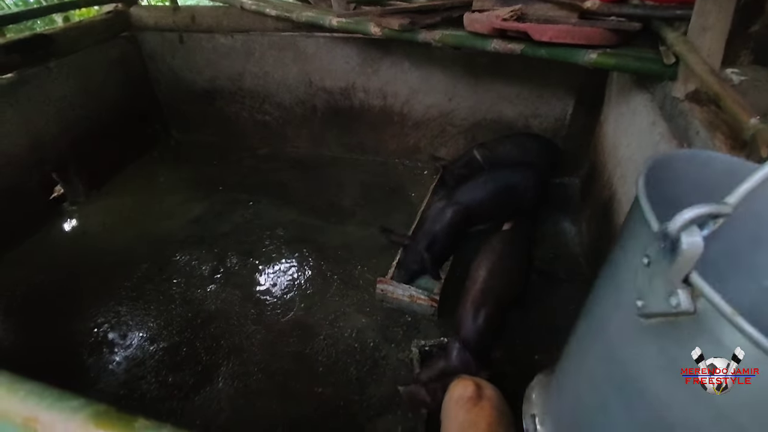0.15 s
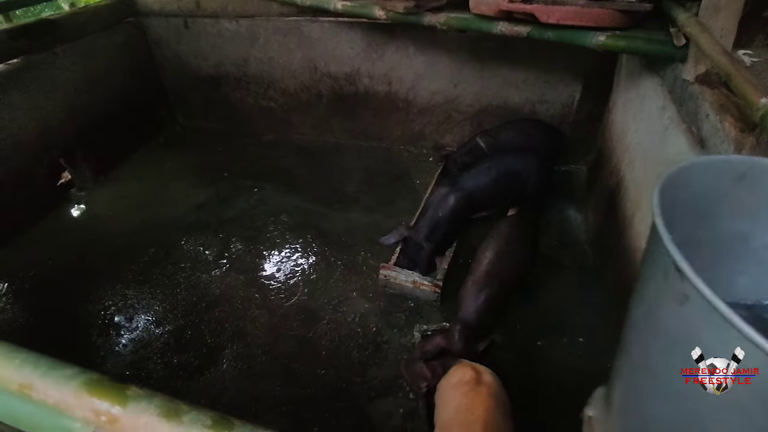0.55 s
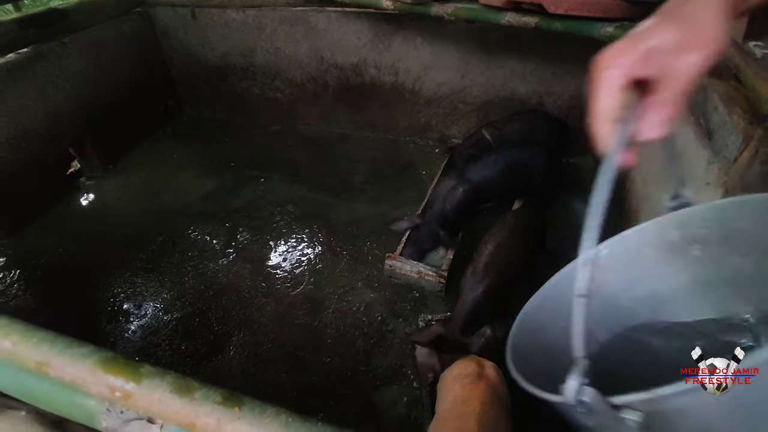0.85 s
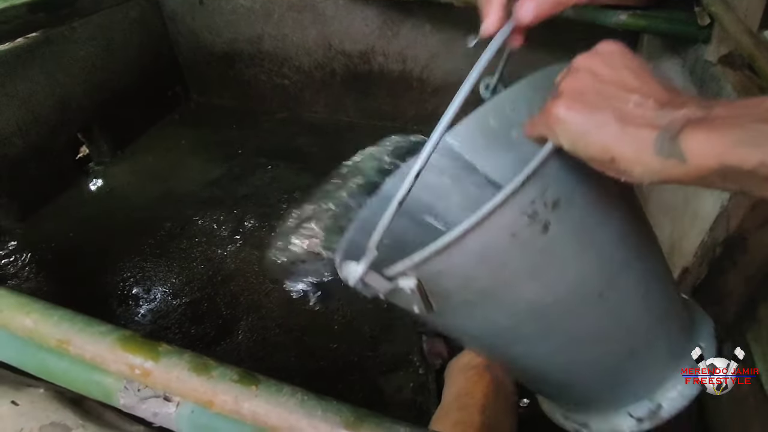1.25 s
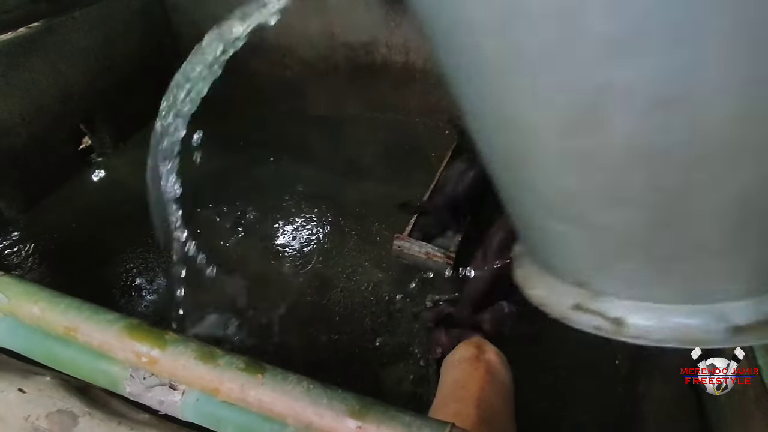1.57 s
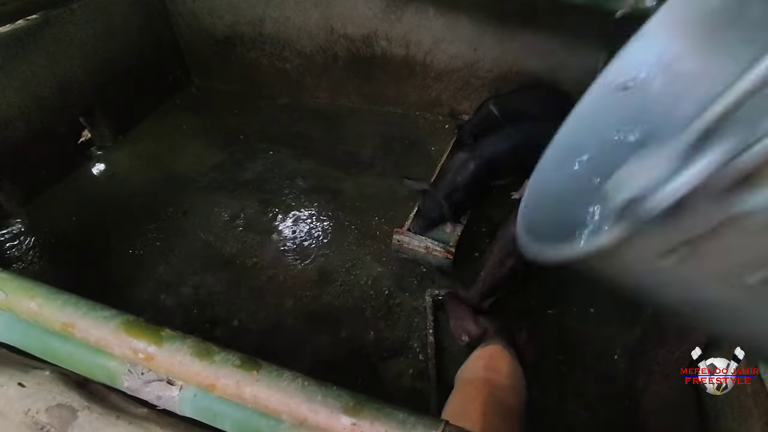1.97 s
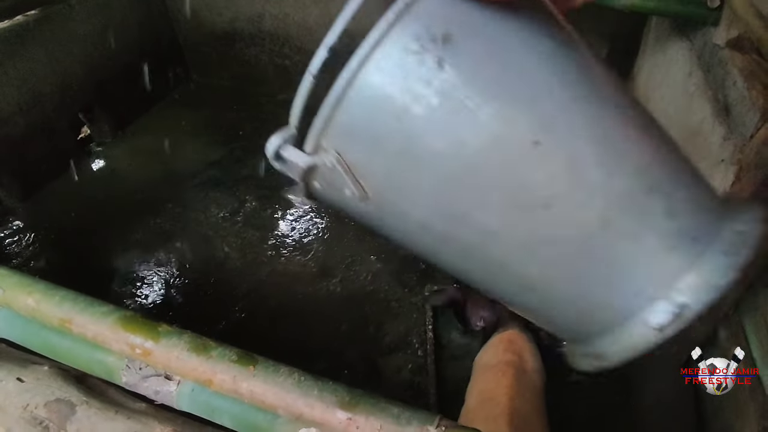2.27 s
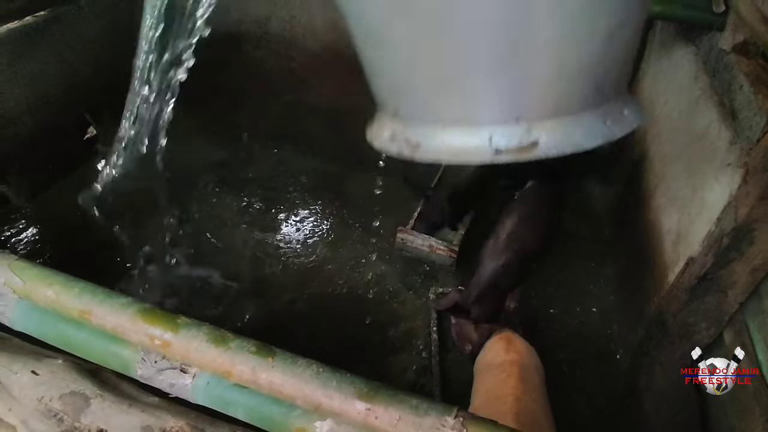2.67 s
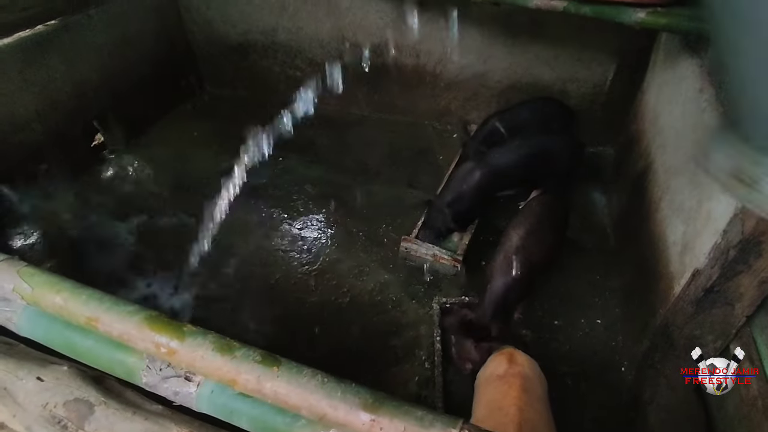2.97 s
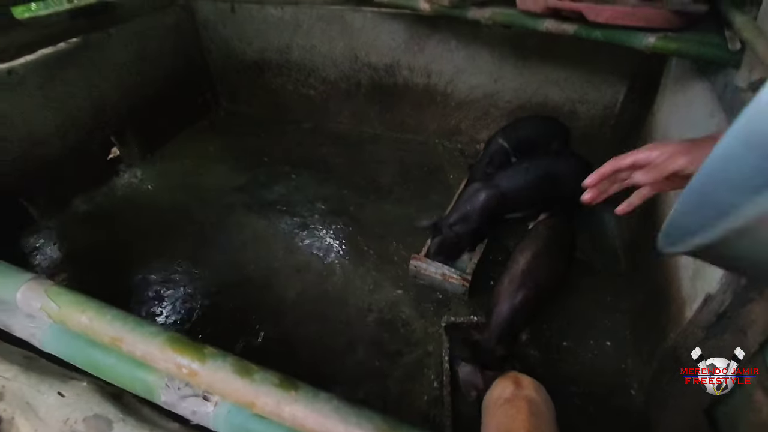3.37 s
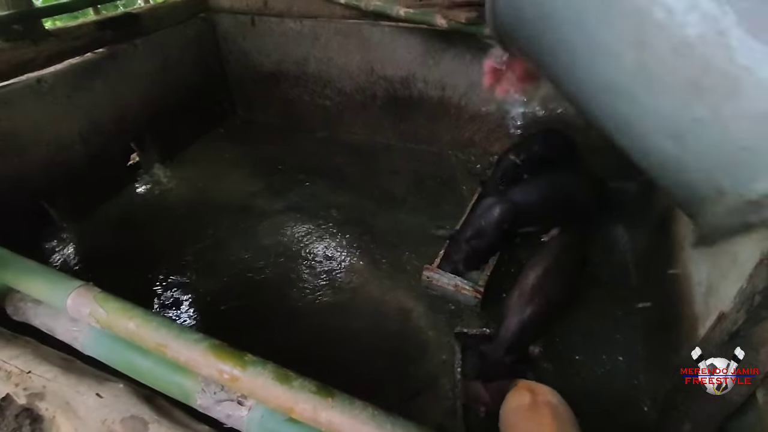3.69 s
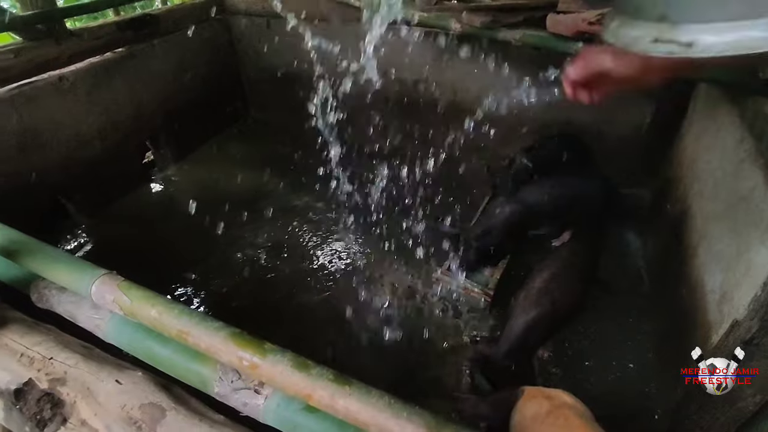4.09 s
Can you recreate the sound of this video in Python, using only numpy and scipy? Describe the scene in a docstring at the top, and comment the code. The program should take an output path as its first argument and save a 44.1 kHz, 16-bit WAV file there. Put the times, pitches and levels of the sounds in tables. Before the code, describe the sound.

In a small walled pen with a wet concrete floor, heard closely in stereo, water slops quietly in a steel bucket from 0 to 1.3 s, with rounded plops, little gurgles, ticks and a soft low wind buffet near 0.9 s. At about 1.4 s the wire handle clanks several times on the rim, ringing briefly and rattling. The first throw lands around 1.6 to 2.1 s, a spattering splash with heavy slaps and bubbly plops near 1.9 s, then thins to drips and a near lull. The second throw swells from 2.65 s, slaps hardest around 2.95 s and fizzes away by 3.4 s. A metallic knock at 3.66 s opens the third, a darker gush peaking near 3.8 s with a loud bang and low air thump. Bright clanks ring at 4.05 and 4.2 s over remaining spatter. Faint steady outdoor hiss continues throughout, with short wall echoes.

```python
"""A small walled pen with a wet concrete floor: water slops in a steel bucket and is thrown out in sheets.
A pair of microphones stands close by, brushed by moving air; the walls answer within a fifth of a second.
Water is showers of tiny damped tones over coloured noise; plops are single bubbles with rising pitch.
Lumps slapping down are bursts of noise, drops and wire tips click, and each blow on the bucket cracks,
rings the steel's modes and rattles the wire handle on the rim."""
import sys
import numpy as np
from scipy import signal
from scipy.fft import rfft, irfft, next_fast_len
from scipy.io import wavfile
from scipy.ndimage import uniform_filter1d, map_coordinates

SR = 44100
rng = np.random.default_rng(int(sys.argv[2]) if len(sys.argv) > 2 else 0)


def transcribe(u):
    """Save the signal u as a 16-bit wav file named by the first command-line argument.

    u: samples, shape (n,) or (channels, n), limited to [-1, 1]; the rate is SR.
    q: integer samples, one column per channel.
    """
    v = np.clip(np.atleast_2d(u).T, -1, 1)
    q = np.round(v * 32767).astype(np.int16)
    wavfile.write(sys.argv[1], SR, q)


N = 186707  # length in samples


def amp(db):
    """Decibels to amplitude factor."""
    return 10 ** (np.asarray(db) / 20)


def unit(x):
    """Scales a signal to an rms of one."""
    return x / np.sqrt(np.mean(x ** 2) + 1e-20)


def along(points, hz):
    """Reads a curve of (Hz, value) points on a log frequency axis."""
    f, v = np.transpose(points)
    return np.interp(np.log(hz + 1), np.log(f + 1), v)


def curves(rows):
    """One value per sample for each column after the time."""
    s, *cols = np.transpose(rows)
    return [np.interp(np.arange(N) / SR, s, c) for c in cols]


def wobble(rate):
    """A smooth random curve, rate knots a second."""
    knots = rng.standard_normal(int(N / SR * 200) + 4)
    return map_coordinates(knots, [np.arange(N) * min(rate, 199) / SR])


def filtered(x, response):
    """Multiplies the spectrum of x by a response of frequency."""
    n = x.shape[-1]
    m = next_fast_len(n + 8192)
    return irfft(rfft(x, m) * response(np.fft.rfftfreq(m, 1 / SR)), m)[..., :n]


def add(track, s, sound):
    """Mixes a sound into the track at second s."""
    part = track[..., max(round(s * SR), 0):][..., :sound.shape[-1]]
    part += sound[..., :part.shape[-1]]


def noise(length):
    """White noise, unrelated at the two microphones."""
    return rng.standard_normal((2, length))


def patches(x, depth_db):
    """Random louder and softer streaks, about 150 Hz by 40 ms."""
    z = signal.stft(x, nperseg=512)[2]
    field = uniform_filter1d(rng.standard_normal(z.shape[1:]), size=2, axis=0)
    field = uniform_filter1d(field, size=7, axis=1)
    return signal.istft(z * amp(depth_db * unit(field)), nperseg=512)[1][:, :N]


# Likeness of the two microphones. Each row: frequency in Hz, left-right likeness from 0 to 1.
MIC_LIKENESS = [(60, 0.95), (250, 0.96), (640, 0.78), (1300, 0.017), (15000, 0.022)]


def spread(pair):
    """Two unrelated signals become a pair alike in the bass and nearly unrelated in the treble."""
    turn = lambda hz: np.arccos(np.clip(along(MIC_LIKENESS, hz), -1, 1)) / 2
    mid, side = filtered(pair, lambda hz: np.array([np.cos(turn(hz)), np.sin(turn(hz))]))
    return np.array([mid + side, mid - side])


# Steady surroundings. Each row: frequency in Hz, relative level in dB per Hz.
YARD_SPECTRUM = [(88, -28), (150, 2.5), (815, -1.5), (1520, -6.5), (2240, 1), (4100, -16), (7950, -9.5),
                 (10400, -16.5), (15700, -8.5)]


def yard():
    """Steady surroundings: coloured noise with patches and a slight waver, at about -50 dB."""
    level = amp(-50.5 + 1.5 * wobble(14))
    bed = filtered(noise(N), lambda hz: amp(along(YARD_SPECTRUM, hz)))
    return level * unit(spread(patches(bed, depth_db=4)))


# Air brushing the microphones. Each row: peak time in seconds, level in dB, rise by 20 dB in seconds,
# fall by 20 dB in seconds, thrum relative to that level in dB.
GUSTS = [(0.33, -58, 0.16, 0.39, -11), (0.94, -39.5, 0.09, 0.11, -5), (1.26, -70, 0.6, 0.33, -4),
         (1.75, -59, 0.75, 0.27, 10), (2.17, -69, 0.092, 0.095, 19), (3.84, -48, 0.024, 0.14, -31),
         (4.13, -68, 0.21, 0.42, 7)]


def gusts():
    """Gust amplitude over time, for the rumble and for the thrum: straight rises and falls in dB."""
    now = np.arange(N) / SR
    total = np.zeros((2, N))
    for s, db, rise, fall, thrum_db in GUSTS:
        below_peak = 20 * np.maximum((s - now) / rise, (now - s) / fall)
        total += amp(db - below_peak + np.array([[0], [thrum_db]]))
    return total


# Rumble of air on the microphones. Each row: frequency in Hz, relative level in dB per Hz.
RUMBLE_SPECTRUM = [(15, -44), (30, -6), (75, -2.5), (110, 0.5), (140, -41), (240, -120)]


def rumble(gust):
    """Moving air buffets the microphones: lumpy low noise, swelling with the gusts."""
    calm_db, shared = -63.5, 0.44  # shared: part of each microphone's rumble that reaches the other
    low = filtered(noise(N), lambda hz: amp(along(RUMBLE_SPECTRUM, hz)))
    lumpy = (low + shared * low[::-1]) * amp(4.4 * wobble(25.0))
    return (amp(calm_db) + gust) * unit(lumpy)


# Thrum of bucket and floor. Each row: frequency in Hz, relative level in dB per Hz.
THRUM_SPECTRUM = [(70, -56), (110, -6), (160, 0.5), (230, -11.5), (330, -4.5), (600, -120)]


def thrum(gust_thrum):
    """Water and gusts shake bucket and floor: low noise that follows the flow and the gusts."""
    rest_db, under_flow_db = -70.5, -25
    flow_db = curves(np.vstack(WATER_FLOW))[0]
    shake = amp(rest_db) + amp(flow_db + under_flow_db) + gust_thrum
    low = filtered(noise(N), lambda hz: amp(along(THRUM_SPECTRUM, hz)))
    return shake * unit(spread(low) * amp(5.2 * wobble(25.18)))


# Pressure jolts. Each row: start in seconds, level in dB, fading time of the pull in seconds,
# time scale of the rebound in seconds.
PRESSURE_JOLTS = [(3.836, -19, 0.021, 0.19), (4.042, -28, 0.0067, 0.038)]


def jolts():
    """Pressure jolts pull the diaphragms in and let them swing back."""
    out, t = np.zeros((2, N)), np.arange(SR // 4) / SR
    for s, db, suck, rebound in PRESSURE_JOLTS:
        swing = 0.37 * np.sin(np.pi * np.clip(t / (1.14 * rebound), 0, 1)) ** 2
        pull = (1 - np.exp(-t / 0.0016)) * np.exp(-t / suck)
        add(out, s, amp(db + np.array([[1.5], [-1.5]])) * (swing - pull))  # stronger on the left
    return out


def air():
    """Moving air: rumble, thrum and jolts at the microphones."""
    gust, gust_thrum = gusts()
    return rumble(gust) + thrum(gust_thrum) + jolts()


# Echo of the walled pen. Each row: frequency in Hz, time to fall by 60 dB in seconds.
PEN_DECAY = [(300, 0.16), (2000, 0.13), (10000, 0.11)]


def pen(x):
    """The walls answer each tenth of a second of sound with a new echo pattern, the treble dying first."""
    out, step = np.zeros((2, N)), SR // 10
    for start in range(0, N, step):
        hz, t, z = signal.stft(noise(SR // 4), SR, nperseg=128)
        tail = signal.istft(z * amp(-60 * t / along(PEN_DECAY, hz)[:, None]), SR, nperseg=128)[1]
        tail = tail / np.linalg.norm(tail[0])
        echo = signal.fftconvolve(x[None, start:start + step], tail, axes=1)
        add(out, start / SR + .002, echo)  # first echo after 2 ms
    return spread(out)


def droplets(count, centre_hz, octaves, cycles, scatter_db):
    """A rain of tiny damped tones, each with its own pitch and size, unrelated in the two channels."""
    length = 400  # samples per tone
    when, pitch, size, chan = rng.random((4, count))
    hz = np.clip(centre_hz * 2 ** (octaves * (2 * pitch - 1)), 100, SR / 2.5)[:, None]
    t = np.arange(length) / SR
    phase = hz * t * (1 + .03 * hz * t / cycles)  # a bubble's pitch rises as it nears the surface
    level = amp(-scatter_db * np.log(size + 0.0091))[:, None]
    tones = level * np.exp(-hz * t / cycles) * np.sin(2 * np.pi * phase)
    right = (chan > .5)[:, None]
    at = (when * N).astype(int)[:, None] + np.arange(length) + right * (N + length)
    both = np.bincount(at.ravel(), tones.ravel(), 2 * (N + length))
    return unit(both.reshape(2, -1)[:, :N])


def layer(grains, share, spectrum, low_hz, flutter_db, patchy_db):
    """Droplets over a bed of rush, coloured together, fluttering and patchy; little below low_hz."""
    mix = np.sqrt(share) * grains + np.sqrt(1 - share) * noise(N)
    mix = patches(mix, patchy_db) * amp(flutter_db * (wobble(23.02) + 2.8 * wobble(60)))
    return unit(filtered(mix, lambda hz: amp(along(spectrum, hz)) * hz ** 2 / (hz ** 2 + low_hz ** 2)))


# Large bubbles, spatter and fine mist. Each row: frequency in Hz, relative level in dB per Hz.
GURGLE_SPECTRUM = [(120, -52), (200, -1), (343, -4.5), (684, -10), (1300, -3.5), (1690, 8.5), (2860, -120)]
SPRAY_SPECTRUM = [(710, 5.5), (1200, -3), (1490, -8), (2120, 0.5), (3010, 1.5), (4590, -7.5), (5070, 0.5),
                  (7500, -16.5), (9750, -41), (16500, -120)]
MIST_SPECTRUM = [(4410, 4), (7500, -2), (8050, -2), (9780, -9.5), (12000, -4), (14900, -2.5), (15700, -21)]
# Moving water, in four groups: slopping in the carried bucket, then the first, second and third throw.
# Each row: time in seconds, flow level in dB, mist relative to the spray in dB.
WATER_FLOW = [
    [(0.0, -53, -3), (0.27, -50.5, -4), (0.51, -45, -2.5), (0.72, -48.5, -18), (0.78, -66, -2),
     (0.825, -55.5, 0), (0.92, -44, -21), (1.0, -53.5, 2), (1.12, -46.5, -20), (1.195, -52, -18),
     (1.256, -47, -19), (1.372, -42.5, -42)],
    [(1.545, -41, -3), (1.585, -38, 7.5), (1.625, -42, 6.5), (1.65, -34, 2), (1.751, -27, -2.5),
     (1.86, -32, -1.5), (1.89, -37.5, 1), (1.91, -36.5, -1), (1.96, -41.5, 4.5), (2.0, -37.5, 2.5),
     (2.1, -36.5, 7.5), (2.14, -46.5, 2), (2.25, -56.5, 0)],
    [(2.6, -70, -4), (2.655, -44.5, -7), (2.676, -41.5, 12.5), (2.778, -33.5, 0.5), (2.822, -44.5, 9.5),
     (2.842, -37, 8.5), (2.956, -23.5, -5.5), (3.08, -29.5, 5), (3.138, -33, -2.5), (3.22, -35, 3.5),
     (3.312, -31.5, 3.5), (3.428, -49, 0)],
    [(3.562, -52.5, -4), (3.655, -37.5, -20), (3.69, -46, 5), (3.724, -26, -23), (3.752, -28.5, -3.5),
     (3.79, -31.5, -6), (3.826, -22, -12.5), (3.93, -46, 0), (4.035, -49, -7), (4.11, -35, -7.5),
     (4.2, -39.5, 10)],
]


def water():
    """Large bubbles gurgle, drops spatter, fine mist fizzes; gentle flow spatters darker than a hard throw."""
    spray_db, mist_db = curves(np.vstack(WATER_FLOW))
    gurgle_db = spray_db - 9.5 - 0.6 * np.maximum(mist_db, -16)  # water with little mist gurgles more
    fizz_db = spray_db + mist_db

    drops = droplets(count=2500, centre_hz=777, octaves=0.75, cycles=2.3, scatter_db=2.6)
    gurgle = layer(drops, .35, GURGLE_SPECTRUM, low_hz=149, flutter_db=1.1, patchy_db=3.5)
    drops = droplets(count=9000, centre_hz=2733, octaves=1.362, cycles=3.5, scatter_db=2.6)
    spray = layer(drops, .35, SPRAY_SPECTRUM, low_hz=700, flutter_db=.5, patchy_db=2.6)
    drops = droplets(count=5000, centre_hz=10900, octaves=0.96, cycles=0.32, scatter_db=-14.0)
    fizz = layer(drops, 0.052, MIST_SPECTRUM, low_hz=3900, flutter_db=.4, patchy_db=4)

    dark = filtered(spray, lambda hz: 1 / (1 + (hz / 3800) ** 4))
    spray = dark + (spray - dark) * amp(0.52 * np.minimum(spray_db + 60, 0))
    return spread(amp(spray_db) * spray + amp(gurgle_db) * gurgle + amp(fizz_db) * fizz)


def bubble(pitch_hz, t):
    """One damped tone of rising pitch, its phase wandering in the churning water."""
    t60 = 0.03  # seconds
    wander = .03 * np.cumsum(rng.standard_normal(len(t)))  # radians
    tone = np.sin(2 * np.pi * pitch_hz * (t + 0.07 * t * t / t60) + wander)
    return amp(-60 * t / t60) * (1 - np.exp(-t / 0.00025)) * tone


# Bubbles closing in the water. Each row: start in seconds, level in dB, starting pitch in Hz.
PLOPS = [(0.0, -27.5, 1220), (0.13, -39.5, 2730), (0.166, -32, 606), (0.362, -22, 787), (0.305, -29.5, 970),
         (0.399, -29.5, 750), (0.398, -35.5, 3340), (0.422, -36, 2720), (0.432, -29, 2850),
         (0.444, -29, 2790), (0.459, -32.5, 590), (0.461, -22.5, 1880), (0.489, -25.5, 1004),
         (0.533, -24, 690), (0.629, -30, 3060), (0.657, -27, 584), (0.733, -42, 3670), (0.83, -37.5, 810),
         (1.009, -32.5, 846), (1.044, -25, 1370), (1.048, -23.5, 2050), (1.126, -39, 1450),
         (1.264, -36, 1810), (1.154, -27.5, 2330), (1.2, -28.5, 1224), (1.225, -29, 410), (1.239, -31, 600),
         (1.287, -31.5, 350), (1.311, -30.5, 2620), (1.322, -26.5, 1700), (1.33, -26, 980),
         (1.345, -32, 680), (1.64, -25.5, 630), (1.7, -22, 636), (1.92, -16, 587), (1.922, -24.5, 880),
         (1.922, -18, 2310), (1.922, -22.5, 2970), (1.945, -29, 600), (1.973, -34, 1730), (1.987, -20, 550),
         (1.99, -32, 740), (2.054, -32, 2520), (2.077, -25.5, 1620), (2.086, -33, 354), (2.146, -32.5, 220),
         (2.197, -39, 2530), (2.273, -33, 2130), (2.415, -40, 850), (2.765, -42, 2800), (2.965, -19, 3110),
         (3.145, -25.5, 473), (3.591, -31.5, 630), (3.617, -27.5, 650)]


def plops():
    """A bubble rings briefly; four quieter neighbours of nearby pitch follow within some ms."""
    out, t = np.zeros(N), np.arange(SR // 8) / SR
    draws = rng.standard_normal((len(PLOPS), 4, 3))
    for (s, db, hz), neighbours in zip(PLOPS, draws):
        add(out, s, amp(db) * bubble(hz, t))
        for late, size, level in neighbours:
            quieter = amp(db - 10.5 + 2 * level)
            add(out, s + 0.0083 * abs(late), quieter * bubble(hz * (1 + 0.065 * size), t))
    return filtered(out, lambda hz: 1j * hz / (1j * hz + 150))  # small bubbles radiate no bass


# Lumps of water slapping down. Each row: start in seconds, relative level in dB, centre in Hz,
# time to fall by 60 dB in seconds.
SLAPS = [(0.081, -32, 2450, 0.056), (0.165, -35, 1190, 0.1), (0.283, -33, 5270, 0.052),
         (0.301, -29, 3500, 0.11), (0.303, -34.5, 1010, 0.54), (0.383, -32, 2620, 0.14),
         (0.5919, -41, 2180, 0.51), (0.6273, -28.5, 2660, 0.064), (0.6342, -24.5, 5440, 0.079),
         (0.7237, -31.5, 3930, 0.14), (0.829, -45, 1050, 0.15), (0.9062, -29, 1030, 0.06),
         (1.041, -26.5, 1150, 0.097), (1.154, -30.5, 2200, 0.042), (1.201, -38, 950, 0.19),
         (1.312, -29, 1670, 0.098), (1.698, -20, 2800, 0.067), (1.752, -22, 3000, 0.051),
         (1.907, -19.5, 2230, 0.095), (1.921, -14.5, 2160, 0.052), (1.9729, -19, 1790, 0.099),
         (1.9863, -21, 3160, 0.27), (2.0537, -19.5, 2370, 0.12), (2.073, -15, 1550, 0.027),
         (2.272, -38, 3060, 0.18), (2.417, -37, 3900, 0.24), (2.6332, -30.5, 2570, 0.14),
         (2.6935, -35, 4530, 0.12), (2.7588, -20, 2640, 0.085), (2.9292, -24, 1230, 0.26),
         (2.949, -18, 4500, 0.075), (3.038, -18.5, 3470, 0.083), (3.0904, -16, 3860, 0.062),
         (3.4598, -30, 930, 0.073), (3.591, -43, 900, 0.13), (3.732, -22, 1150, 0.15),
         (3.799, -16, 2500, 0.37), (3.812, -23.5, 790, 0.23), (3.8237, -22.5, 4440, 0.52)]


def slaps():
    """A sudden burst of spray around one pitch region that thins out, with some mist above it."""
    out, t = np.zeros((2, N)), np.arange(SR // 5) / SR
    for s, db, centre_hz, t60 in SLAPS:
        mist_db = -24 + 0.99 * np.log2(centre_hz / 2500)  # brighter slaps carry more mist

        def colour(hz):
            body_db = -14 * np.abs(np.log2((hz + 1) / centre_hz))  # fall per octave from the centre
            return amp(np.maximum(body_db, along(MIST_SPECTRUM, hz) + mist_db)) * hz / (hz + 400)

        burst = unit(filtered(noise(len(t)), colour))
        rise = 1 - np.exp(-t / (.012 * t60))
        add(out, s, burst * amp(db - 5.5 - 60 * t / t60) * rise)
    return spread(out)


# Single drops or the wire's tip striking steel or concrete.
# Each row: start in seconds, peak level in dB, centre in Hz.
TICKS = [(0.112, -26.5, 6200), (0.124, -35, 4500), (0.2389, -25, 2300), (0.239, -25.5, 7100),
         (0.247, -37, 7500), (0.281, -29, 6000), (0.311, -28, 6000), (0.385, -30, 4800), (0.636, -37, 5500),
         (1.3805, -10.5, 4800), (1.599, -25, 5250), (1.923, -14.5, 2370), (2.076, -21, 1600),
         (2.969, -15, 2750), (3.664, -10.5, 2680), (3.8385, -7, 4460), (4.044, -5, 5500)]


def ticks():
    """A dry click of a few ms around one pitch region."""
    out, t = np.zeros((2, N)), np.arange(SR // 50) / SR
    for s, db, centre_hz in TICKS:
        colour = lambda hz: amp(-10 * np.abs(np.log2((hz + 1) / centre_hz)))  # dB per octave from the centre
        click = filtered(noise(len(t)), colour)
        click = click * amp(-60 * t / .012) * np.minimum(t * 2000, 1)  # dies by 60 dB in 12 ms
        add(out, s, amp(db) * click / np.abs(click).max(axis=1, keepdims=True))
    return out


def drift(rough, t):
    """Water and hands unsettle a ring's phase: a random walk, rough radians per sample."""
    return rough * np.cumsum(rng.standard_normal(len(t)))


# The bucket's wall and rim. Each row: nominal mode in Hz, relative level in dB,
# time to fall by 60 dB in seconds.
STEEL_MODES = [(674, -16.5, 0.14), (995, -14, 0.15), (1542, -9, 0.094), (2320, -8, 0.15), (2594, -10, 0.16),
               (2983, -2, 0.12), (3180, -11, 0.081), (3550, -11, 0.21), (3756, -5.5, 0.15),
               (4220, -1, 0.076), (4452, -6, 0.14), (4890, -1.5, 0.06), (5100, -3.5, 0.095),
               (5080, -3, 0.094), (5600, -5, 0.055), (6130, -1, 0.048), (6400, -26, 0.033),
               (6800, -15, 0.042), (7200, -15, 0.034), (8200, -10, 0.11), (11300, -14.5, 0.17),
               (13800, -13, 0.11), (14100, -5, 0.11)]


def wall_ring(t):
    """Modes of wall and rim, each struck at a new strength; the grip shifts their pitch from blow to blow."""
    ring = np.zeros((2, len(t)))
    for hz, level_db, t60 in STEEL_MODES:
        strength = amp(level_db + rng.normal(0, 3.55) - 60 * t / t60)
        turns = hz * rng.normal(1, .02) * t + rng.random((2, 1))
        ring += strength * np.sin(2 * np.pi * turns + drift(0.079, t))
    return ring


# The empty bucket's bottom. Each row: mode in Hz, relative level in dB, time to fall by 60 dB in seconds.
BOTTOM_MODES = [(313, -3, 0.16), (404, -20, 0.15)]


def bottom_boom(s, t):
    """The bottom's low modes; the water left in the bucket until 3.5 s lowers their pitch."""
    loading = 0.94 if s < 3.5 else 1
    boom = np.zeros(len(t))
    for hz, level_db, t60 in BOTTOM_MODES:
        boom += amp(level_db - 60 * t / t60) * np.sin(2 * np.pi * hz * loading * t + drift(.004, t))
    return (1 - np.exp(-t / .0025)) * boom


# Rattle of wire on steel. Each row: frequency in Hz, relative level in dB per Hz.
RATTLE_SPECTRUM = [(240, -39), (400, -14), (1750, -1), (3080, -8.5), (4260, -8.5), (5040, 0.5),
                   (6960, -4.5), (10400, -18), (11000, -5.5), (15700, -9.5)]


def wire_rattle(t60, t):
    """The loose wire chatters on steel, contacts about a ms apart; the treble dies sooner."""
    chatter = amp(5.5 * np.repeat(rng.random(len(t) // 50 + 1), 50)[:len(t)])
    rattle = unit(filtered(noise(len(t)) * chatter, lambda hz: amp(along(RATTLE_SPECTRUM, hz))))
    dull = filtered(rattle, lambda hz: 1 / (1 + (hz / 7500) ** 6))
    bright = (rattle - dull) * amp(-45 * t / t60)
    return amp(-5.0 - 60 * t / t60) * (dull + bright)


# The handle or a hand on the bucket, rebounds included. Each row: start in seconds, level in dB,
# boom relative to that level in dB, rattle's 60 dB fall in seconds, brightness in dB per octave,
# loudest region in Hz.
CLANKS = [(1.379, -9, -45, 0.1, -3.5, 4700), (1.387, -8.5, -41, 0.091, -0.5, 2780),
          (1.396, -21, -43, 0.13, -5.5, 4800), (1.444, -13, -28, 0.24, -4.5, 1020),
          (1.448, -16, -48, 0.13, -3, 2800), (1.455, -12.5, -39, 0.083, -2.5, 5070),
          (1.469, -14.5, -38, 0.082, -4, 4800), (1.483, -25, -35, 0.11, -5, 1100),
          (1.527, -16.5, -25, 0.065, -5, 2030), (3.084, -38, 22.5, 0.22, -12, 1010),
          (3.138, -45, 15, .1, -9, 1000), (3.662, -11.5, -15, 0.039, -4.5, 2650),
          (3.837, -9.5, -14, 0.015, 3.5, 4040), (3.846, -10, -37, 0.2, -0.5, 3760),
          (4.041, -7, -9, 0.15, -2, 6700), (4.049, -11.5, -14, 0.32, -4, 6500),
          (4.203, -6.5, -24, 0.12, -4, 5800), (4.213, -18.5, -26, 0.12, 10, 5260)]


def bucket():
    """Every blow cracks, then rings wall and bottom; the loose wire rattles on for some ms."""
    out, t = np.zeros((2, N)), np.arange(SR // 2) / SR
    rise = 1 - np.exp(-t / .0006)
    for s, db, boom_db, t60, bright_db, focus_hz in CLANKS:
        def colour(hz):
            # the sound falls off away from the region a blow excites most
            focus_db = -3.5 * np.minimum(np.abs(np.log2((hz + 300) / focus_hz)), 1.5)
            tilt_db = bright_db * np.log2(np.minimum(hz + 300, 7500) / 4000)  # no further tilt above about 7 kHz
            return amp(focus_db) * amp(tilt_db)

        crack = amp(0.5 - 60 * t / .013) * filtered(noise(len(t)), lambda hz: hz / (hz + 1500))
        blow = amp(-10) * wall_ring(t) + wire_rattle(t60, t) + crack
        steel = filtered(spread(blow), colour)
        add(out, s, amp(db) * rise * (steel + amp(boom_db) * bottom_boom(s, t)))
    return out


def scene():
    """Yard and air, moving water, then the close bubbles, slaps, ticks and clanks with the walls' answer."""
    bubbles = plops()
    near = np.array([bubbles, np.roll(bubbles, 14)])  # the right microphone hears them 14 samples later
    blows = slaps() + bucket()
    walls = amp(-3.5) * pen(bubbles) + amp(-5.5) * pen(blows[0])
    return yard() + air() + walls + water() + near + ticks() + blows


# Balance of the microphones. Each row: frequency in Hz, left minus right in dB.
MIC_LEAN = [(60, -1), (110, 0), (200, -0.5), (380, -0.5), (700, -1.5), (1290, -0.5), (2380, 0.5),
            (4400, -1), (8120, -0.5), (15000, 5)]
# The level dips briefly. Each row: start in seconds, end in seconds, level change in dB.
LEVEL_DIPS = [(1.519, 1.525, -10), (3.829, 3.837, -26)]


def record(dry):
    """The microphones lean differently by frequency; the level dips briefly; the top band is cut off."""
    t = np.arange(N) / SR
    dip_db = np.zeros(N)
    for start, end, db in LEVEL_DIPS:
        dip_db += db * np.clip(np.minimum(t - start, end - t) * 1000, 0, 1)  # 1 ms slopes

    def response(hz):
        lean = amp(np.array([[.5], [-.5]]) * along(MIC_LEAN, hz))
        band = amp(-np.clip((hz - 15650) / 10, 0, 30)) * (hz < 16600)  # down 30 dB, then silence
        return lean * band

    return filtered(dry * amp(dip_db), response)


dry = scene()
out = record(dry)
transcribe(out)
```